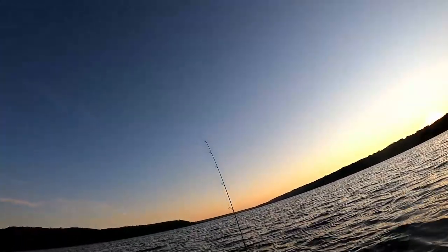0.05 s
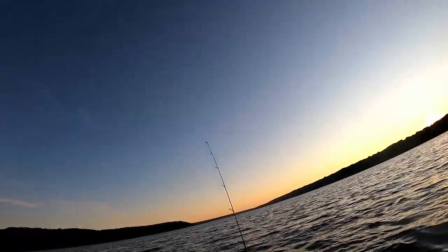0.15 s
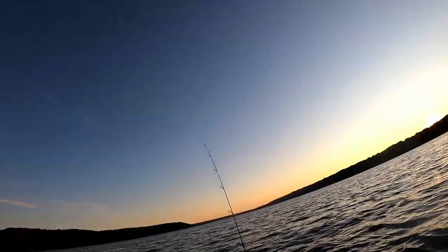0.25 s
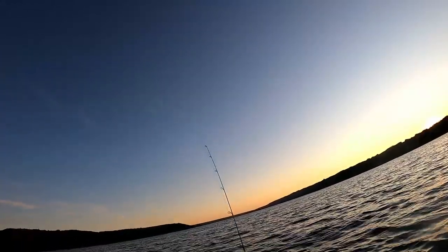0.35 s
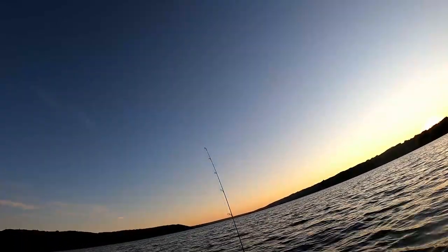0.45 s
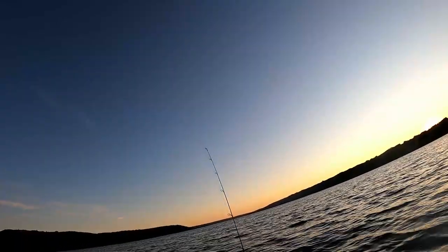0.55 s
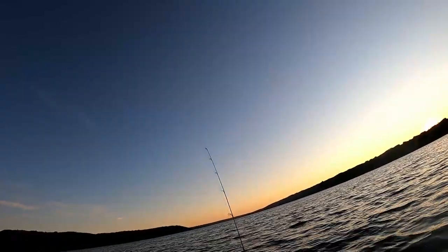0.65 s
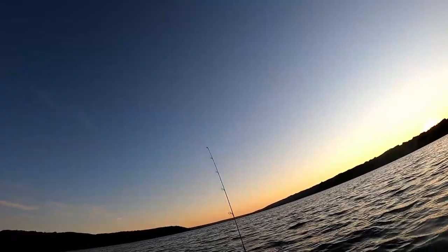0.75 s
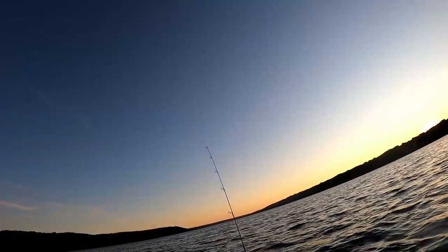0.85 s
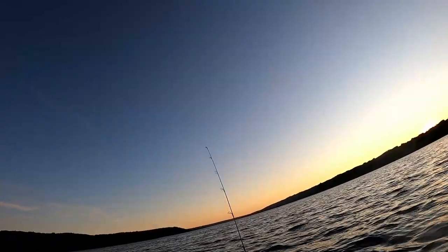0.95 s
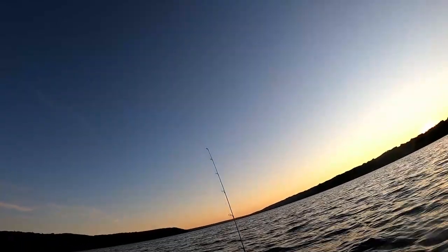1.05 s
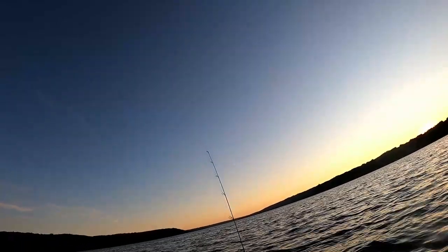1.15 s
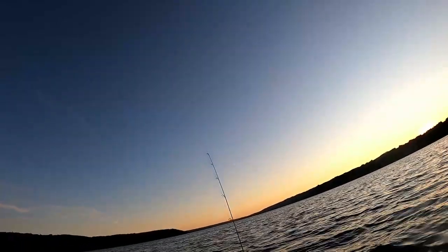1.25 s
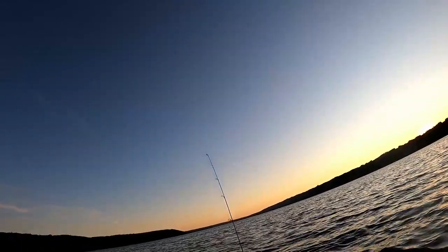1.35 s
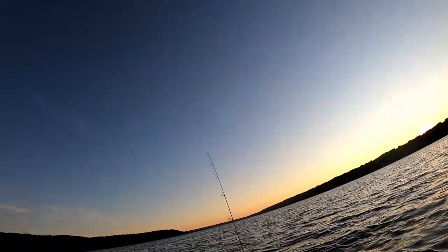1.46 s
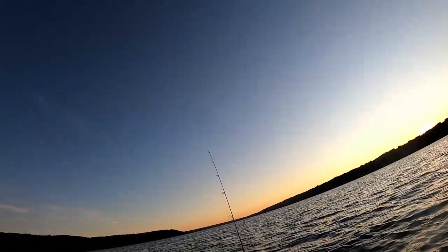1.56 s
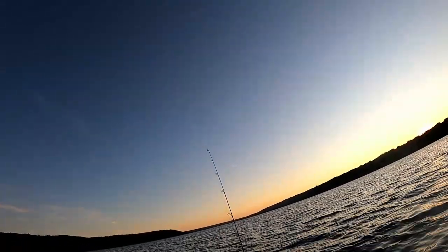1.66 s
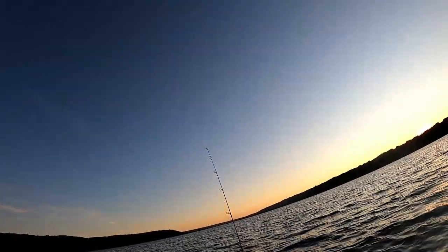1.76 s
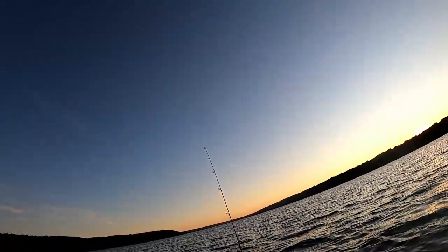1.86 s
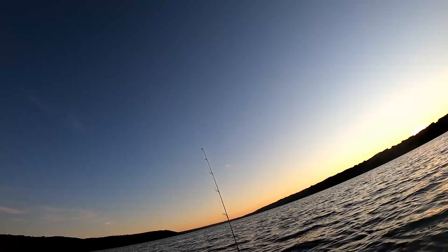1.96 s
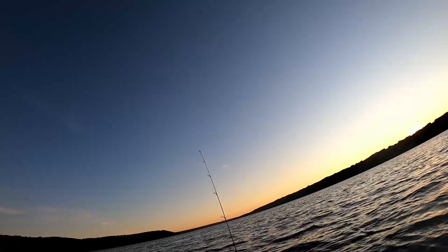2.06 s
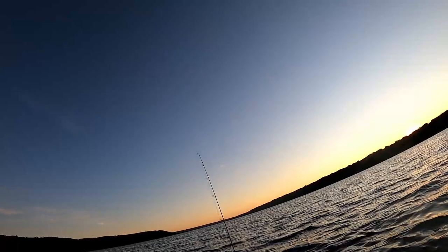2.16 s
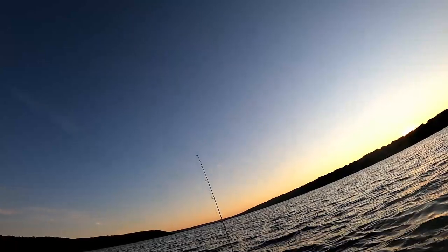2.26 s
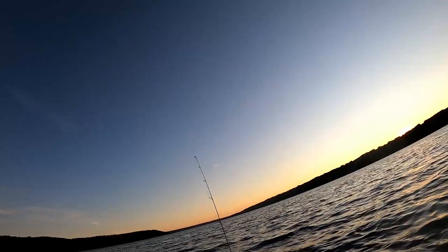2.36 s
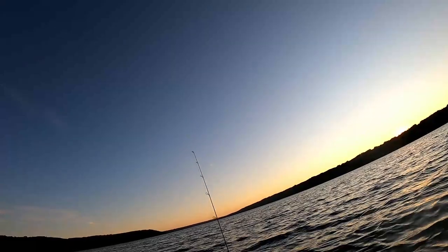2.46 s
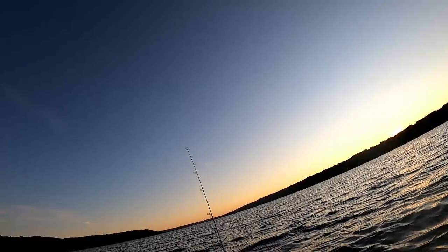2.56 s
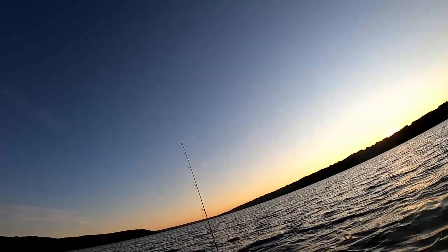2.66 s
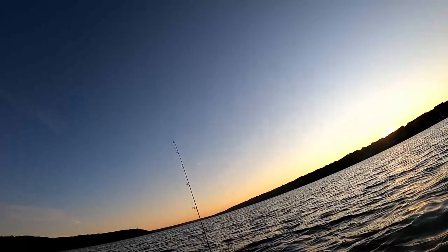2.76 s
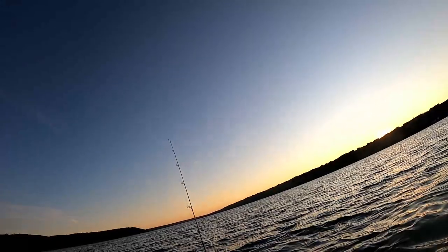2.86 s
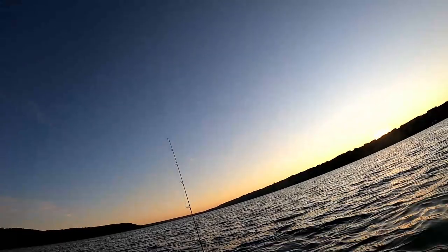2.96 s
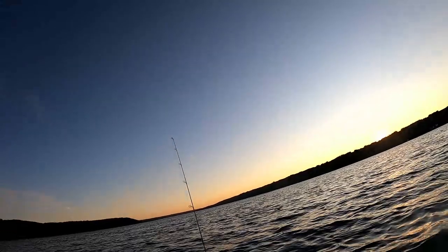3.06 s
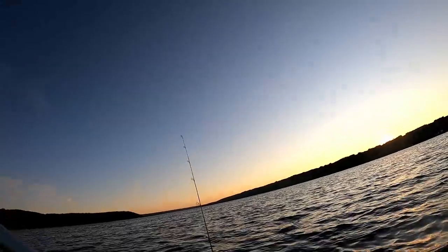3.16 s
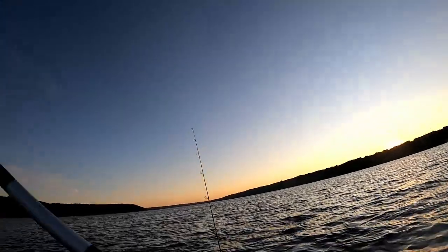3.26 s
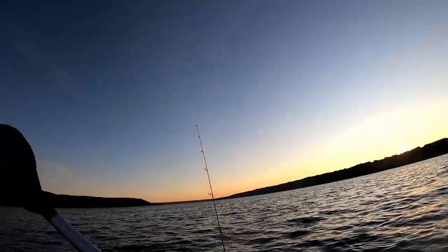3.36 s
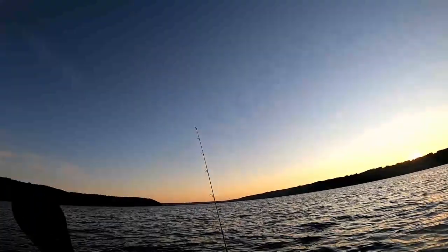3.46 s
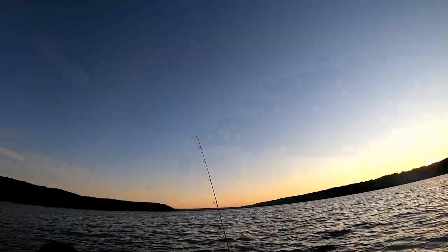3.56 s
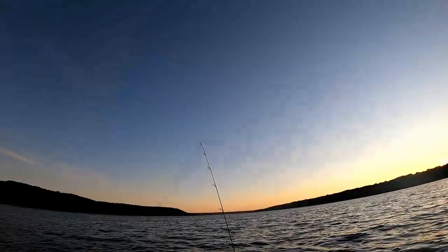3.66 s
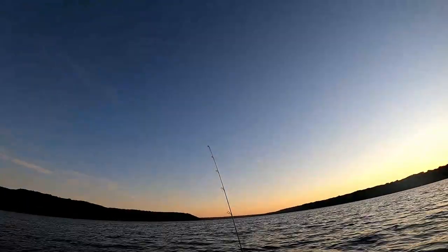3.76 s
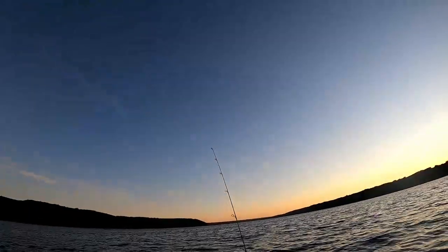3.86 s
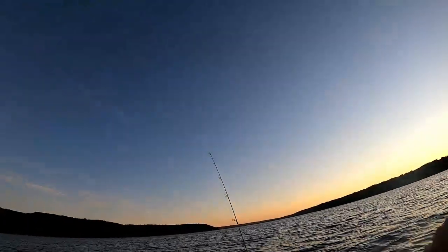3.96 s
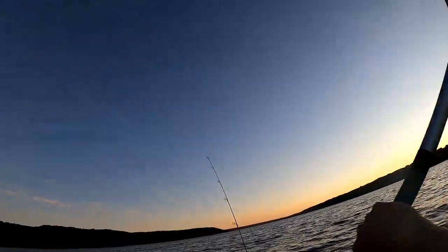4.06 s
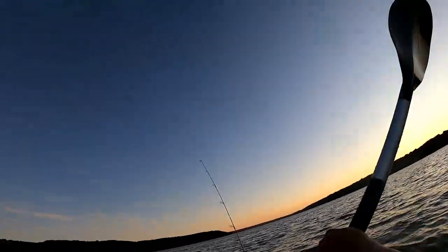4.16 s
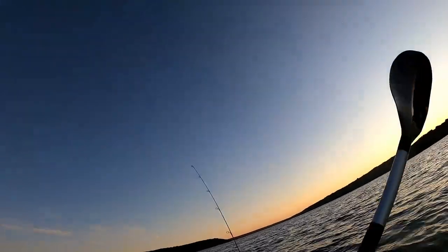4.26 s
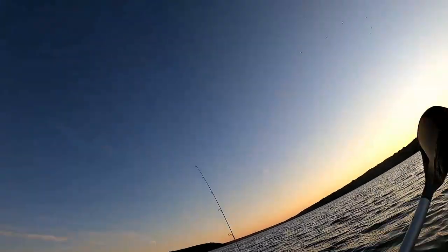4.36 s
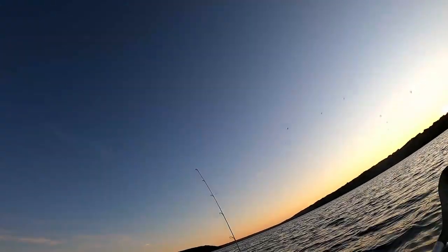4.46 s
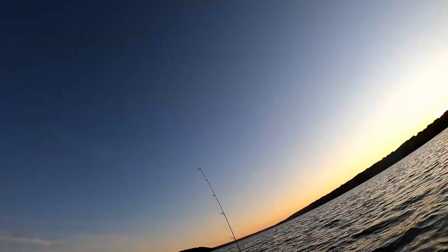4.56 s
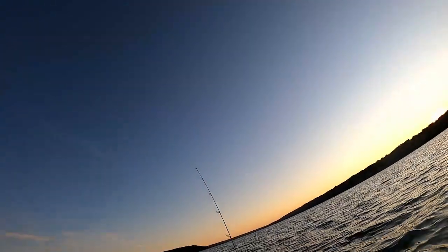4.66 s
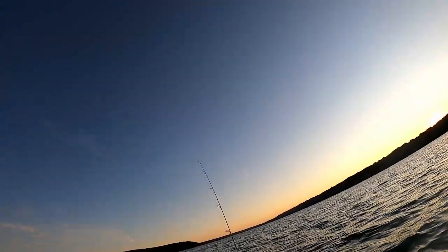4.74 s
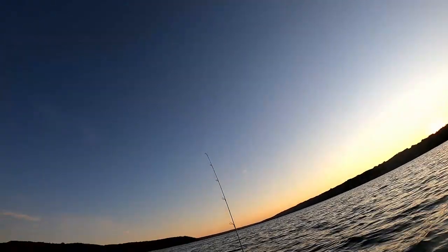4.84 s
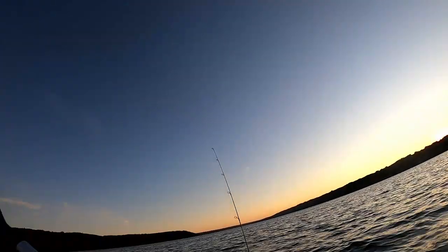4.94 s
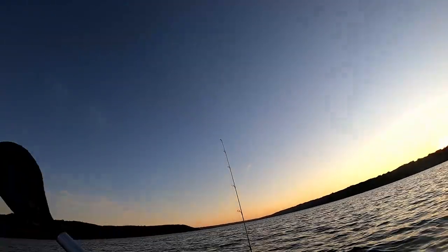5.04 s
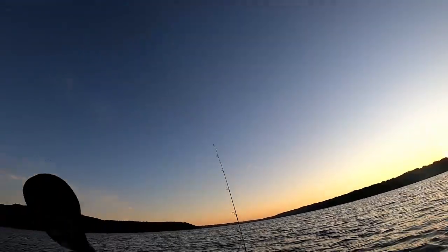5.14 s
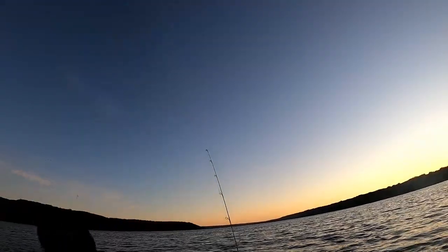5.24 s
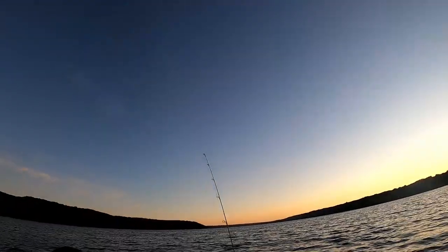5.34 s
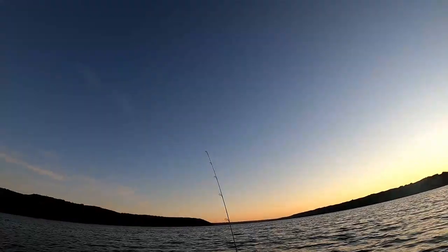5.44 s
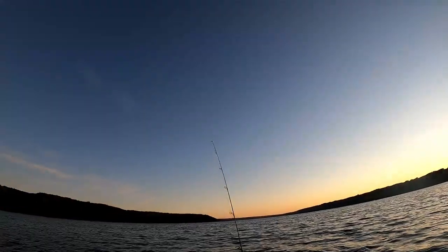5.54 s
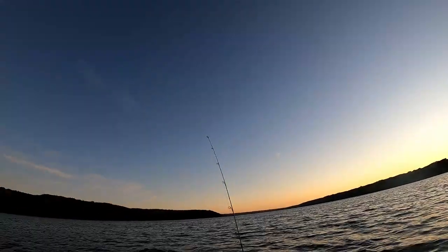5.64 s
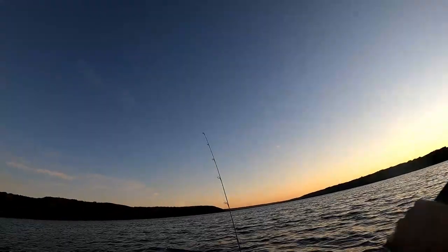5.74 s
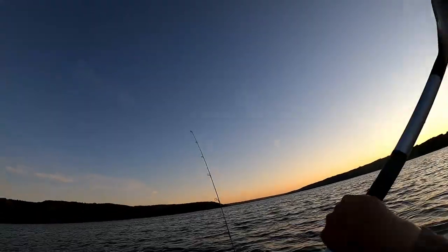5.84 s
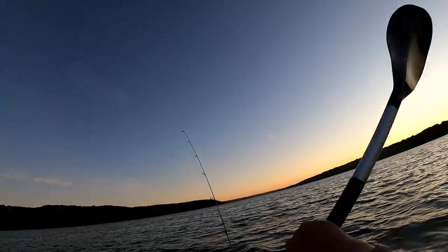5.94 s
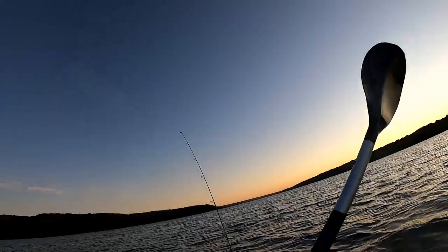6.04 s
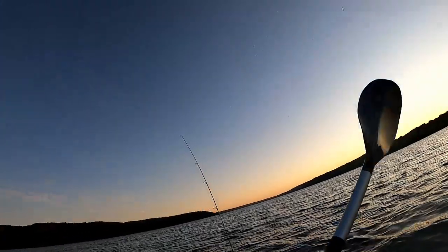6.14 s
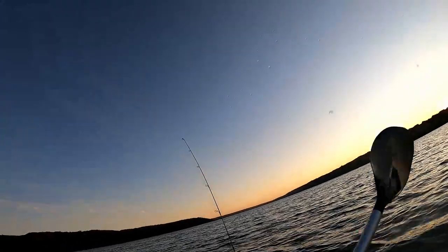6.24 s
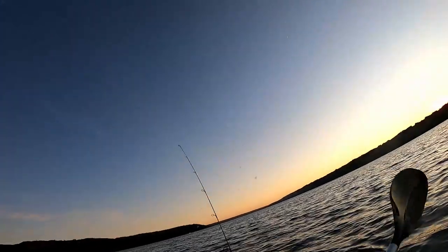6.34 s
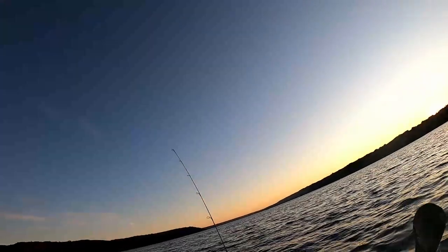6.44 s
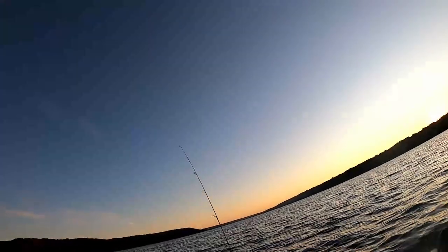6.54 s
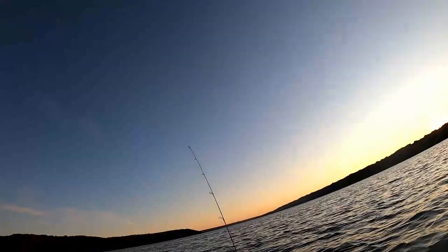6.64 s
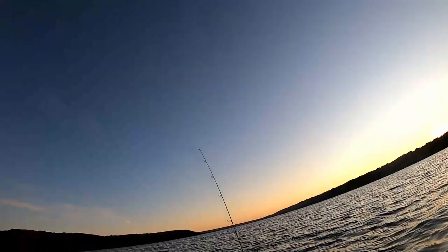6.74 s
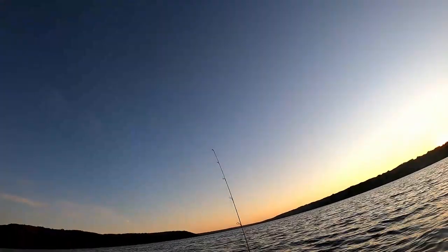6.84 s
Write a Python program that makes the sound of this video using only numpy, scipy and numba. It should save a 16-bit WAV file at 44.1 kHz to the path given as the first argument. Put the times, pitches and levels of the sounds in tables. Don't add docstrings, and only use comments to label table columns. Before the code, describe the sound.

A microphone in a housing sits on an inflatable kayak on a choppy lake, its treble softened. Low wind rumble comes in short, uneven puffs throughout, over a faint murmur of distant water. From 0 to 3.4 seconds the boat rests: quiet wavelets lap the hull, with bubbly drips and fine droplet ticks. A small slap comes at 1.3, a clearer plop with a bubble cluster near 2.5, and another slap at 3.25. Very faint, thin bird whistles occur around 2.0, 2.8 and 3.1. From 3.5 the paddle enters and the water grows much louder: hollow gulps and gurgling at 3.7 to 4.2, splashy wash and plinking drops at 4.3 to 5, more glugs around 5.3 to 5.6. Crisp spatter comes at 5.9 to 6.2, then a splash at 6.2 and deep gulp at 6.4, bubbling and dripping to the end. Wind buffets hardest around 4.3 to 4.7 and after 6.

```python
import sys
import numpy as np
from scipy import signal
from scipy.io import wavfile
from scipy.ndimage import uniform_filter1d
from numba import njit

SR = 44100
rng = np.random.default_rng(int(sys.argv[2]) if len(sys.argv) > 2 else 0)


def unload_audio(sound):
    columns = np.transpose(np.atleast_2d(sound))
    steps = np.round(np.clip(columns, -1, 1) * 32767)
    wavfile.write(sys.argv[1], SR, steps.astype(np.int16))


def volts_from_decibels(level):
    exponent = np.asarray(level, float) / 20
    return 10 ** exponent


N = 304290
STEP = 32


def rms_one(x):
    return x / np.sqrt(np.mean(x ** 2) + 1e-20)


def drift(rate_hz):
    r = np.exp(-2 * np.pi * rate_hz * STEP / SR)
    settle = 3000
    white = rng.standard_normal(N // STEP + 2 + settle)
    return rms_one(signal.lfilter([1], [1, -2 * r, r * r], white)[settle:])


def smooth_db(slow_db):
    return np.interp(np.arange(N) / STEP, np.arange(len(slow_db)), slow_db)


def smooth_gain(slow_db):
    return np.interp(np.arange(N) / STEP, np.arange(len(slow_db)), volts_from_decibels(slow_db))


def total_db(power):
    return smooth_db(10 * np.log10(power))


def surges(rows, rise_db_per_s, fall_db_per_s):
    t = np.arange(N // STEP + 2) * STEP / SR
    start, hold, level_db = np.transpose(rows)[:3, :, None]
    climb_db = rise_db_per_s * np.maximum(start - t, 0)
    fall_db = fall_db_per_s * np.maximum(t - start - hold, 0)
    return volts_from_decibels(2 * (level_db - climb_db - fall_db))


def banded_noise(spectrum, shared_db, own_db, rate_hz):
    hz, level_db = np.transpose(spectrum)
    edges = hz[0] * 2 ** np.arange(0, np.log2(hz[-1] / hz[0]) + .01, .5)
    out, together, white = 0, drift(rate_hz), rng.standard_normal((2, N))
    for k, (low, high) in enumerate(zip(edges, edges[1:])):
        sos = signal.butter(2, [low, high], "band", fs=SR, output="sos")
        band = signal.sosfilt(sos, white[k % 2])
        centre_db = np.interp(np.log(low * high) / 2, np.log(hz), level_db)
        out = out + band * smooth_gain(centre_db + shared_db * together + own_db * drift(rate_hz))
    return rms_one(out)


@njit
def add(out, at, hz, size, cycles, rise, sr):
    for i in range(len(at)):
        life = cycles[i] * sr / hz[i]
        fall, swell = np.exp(-7 / life), np.exp(-18 / life)
        tail, head = size[i], size[i]
        for n in range(min(int(life), len(out) - at[i])):
            phase = 2 * np.pi * hz[i] / sr * n * (1 + rise[i] * n / life)
            out[at[i] + n] += (tail - head) * np.sin(phase)
            tail, head = tail * fall, head * swell
    return out


def grains(per_s, low_hz, high_hz, cycles, rise, spread_db, tilt_db):
    chance, place, luck, life, climb = rng.random((5, N))
    at = np.nonzero(chance < per_s / SR)[0]
    hz = low_hz * (high_hz / low_hz) ** place[at]
    luck_db = spread_db * np.minimum(-np.log(1 - luck[at]), 4)
    size = volts_from_decibels(luck_db + tilt_db * np.log2(hz / low_hz))
    return rms_one(add(np.zeros(N), at, hz, size, cycles * (.5 + life[at]), 2 * rise * climb[at], SR))


def swarm(busy, per_s, low_hz, high_hz, cycles, spread_db, tilt_db):
    bursts = grains(per_s * busy, low_hz, high_hz, cycles, 0.271, spread_db, tilt_db)
    return rms_one(bursts / np.sqrt(busy))


def chirps(rows, rise):
    out = np.zeros(N + SR)
    for s, peak_db, hz, t60 in rows:
        t60 = np.clip(t60, .004, .3)
        t = np.arange(int(t60 * SR)) / SR
        shape = (1 - np.exp(-t * hz * 1.8)) ** 2 * volts_from_decibels(-60 * t / t60)
        tone = np.sin(2 * np.pi * hz * (t + rise * t * t / t60)) * shape / shape.max()
        out[round(s * SR):][:len(t)] += volts_from_decibels(peak_db) * tone
    return out[:N]


def small_bubbles(rows):
    return chirps([(s, peak_db, hz, 0.012 + 22 / hz) for s, peak_db, hz in rows], rise=0.14)


def ticks(drops, under_db, crackle):
    swell_cycles, puff_cycles, ring_cycles = 8, 30, 48
    out, t = np.zeros(N + SR), np.arange(500) / SR
    for (s, peak_db, hz), puff in zip(drops, rng.standard_normal((len(drops), 500))):
        swell = np.sin(np.pi / 2 * np.minimum(t * hz / swell_cycles, 1)) ** 2
        band = signal.butter(2, [hz / 1.3, hz * 1.4], "band", fs=SR, output="sos")
        puff = signal.sosfilt(band, puff * swell * volts_from_decibels(-60 * t * hz / puff_cycles))
        ring = np.sin(2 * np.pi * hz * (t + 6.1 * t * t)) * swell * volts_from_decibels(-60 * t * hz / ring_cycles)
        drop = crackle * puff / np.abs(puff).max() + 1.38 * ring
        start = round((s - .5 * swell_cycles / hz) * SR)
        out[start:][:500] += volts_from_decibels(peak_db - under_db) * drop
    return out[:N]


def slides(rows, wobble_db):
    out = np.zeros(N)
    for s, length, first_hz, last_hz, level_db in rows:
        hz = np.linspace(first_hz, last_hz, int(length * SR))
        fade = np.minimum(2 * np.hanning(len(hz)), 1) ** .5
        out[round(s * SR):][:len(hz)] += volts_from_decibels(level_db) * fade * np.sin(2 * np.pi * np.cumsum(hz) / SR)
    return out * smooth_gain(wobble_db * drift(70))


# (start [s], hold [s], rumble level [dB], buffet over the rumble [dB])
WIND_GUSTS = [(0.004, 0.053, -30.5, -12), (0.197, 0.027, -40.5, 3.5), (0.282, 0.057, -30.5, -25),
              (0.558, 0.2, -35.5, -6.5), (1.07, 0.5, -37.5, -7.5), (1.457, 0.26, -35, -26),
              (1.787, 0.013, -33.5, -15), (1.928, 0.075, -28, -17), (2.113, 0.22, -32, -11),
              (2.42, 0.08, -48.5, 10), (2.714, 0.013, -36, 0), (2.926, 0.29, -37, -15),
              (3.237, 0.36, -40.5, -4), (3.747, 0.039, -27, -13), (3.903, 0.21, -35, -1),
              (4.307, 0.17, -19.5, 0), (4.527, 0.055, -23.5, 12.5), (4.623, 0.1, -19.5, -1.5),
              (4.788, 0.26, -32.5, -10.5), (5.125, 0.43, -34.5, -6.5), (5.54, 0.017, -32, 2),
              (5.65, 0.25, -33.5, -8.5), (6.03, 0.3, -21.5, 0), (6.444, 0.36, -19.5, -1)]


def wind_levels():
    lull_rumble_db, lull_buffet_db = -41, -47
    gusts = surges(WIND_GUSTS, rise_db_per_s=495, fall_db_per_s=249)
    hardness = volts_from_decibels(2 * np.transpose(WIND_GUSTS)[3])
    rumble_db = total_db(volts_from_decibels(2 * lull_rumble_db) + gusts.sum(axis=0))
    buffet_db = total_db(volts_from_decibels(2 * lull_buffet_db) + hardness @ gusts)
    return rumble_db, buffet_db


# (frequency [Hz], level per Hz [dB])
RUMBLE_SPECTRUM = [(15, -11), (30, 5.5), (60, -5.5), (90, -2.5), (130, -19), (200, -38)]
# (frequency [Hz], level per Hz [dB])
BUFFET_SPECTRUM = [(60, 7), (110, 1.5), (170, 9), (250, -17.5), (400, -21), (800, -27.5)]
# (frequency [Hz], level per Hz [dB])
TEARING_SPECTRUM = [(150, -1), (260, -7), (400, -12.5), (700, -16.5), (1000, -34)]


def wind():
    rumble_db, buffet_db = wind_levels()
    rumble = banded_noise(RUMBLE_SPECTRUM, shared_db=2.0, own_db=-0.86, rate_hz=35.0)
    buffet = banded_noise(BUFFET_SPECTRUM, shared_db=0.0, own_db=4.5, rate_hz=20.2)
    tearing = banded_noise(TEARING_SPECTRUM, shared_db=7.5, own_db=3.0, rate_hz=37.5)
    tearing_db = 1.22 * buffet_db - 8.0
    return volts_from_decibels(rumble_db) * rumble + volts_from_decibels(buffet_db) * buffet + volts_from_decibels(tearing_db) * tearing


# (frequency [Hz], level per Hz [dB])
LAKE_SPECTRUM = [(120, -18.5), (200, -3), (454, -16), (923, -30), (1330, -16.5), (2420, -43), (8200, -47),
                 (15500, -75)]


def far_lake():
    return volts_from_decibels(-56.5) * banded_noise(LAKE_SPECTRUM, shared_db=1.2, own_db=2.2, rate_hz=6)


def hull_hum():
    centre_hz, width_hz, level_db = 305, 20, -65.5
    edges = [centre_hz - width_hz / 2, centre_hz + width_hz / 2]
    sos = signal.butter(2, edges, "band", fs=SR, output="sos")
    return volts_from_decibels(level_db) * rms_one(signal.sosfilt(sos, rng.standard_normal(N)))


# (time [s], peak level [dB], pitch [Hz])
HULL_PATTER = [(0.035, -52, 2700), (0.143, -46, 2520), (0.2, -45.5, 2520), (0.28, -48, 3600),
               (0.427, -51.5, 2880), (0.5117, -53.5, 2970), (0.6055, -55, 2820), (0.885, -49.5, 4230),
               (0.933, -61, 2900), (1.232, -43, 2280), (1.394, -48, 3050), (1.763, -50, 3180),
               (1.919, -59, 3000), (2.389, -52, 3200), (2.6474, -67, 2700), (2.692, -47, 3230),
               (2.7144, -36, 2700), (2.7636, -38, 2540), (3.209, -50, 2500), (3.285, -38, 3320),
               (3.448, -42, 2700)]


def patter():
    return ticks(HULL_PATTER, under_db=-3.0, crackle=0.73)


# (time [s], peak level [dB], pitch [Hz])
HULL_DRIPS = [(0.037, -43, 1350), (0.279, -40.5, 1250), (0.519, -46.5, 1340), (0.557, -40, 1350),
              (0.724, -39.5, 1700), (0.834, -45, 1190), (0.886, -40, 1400), (1.233, -43, 2690),
              (1.31, -38, 1140), (1.331, -32, 1230), (1.372, -39, 1800), (1.39, -39, 1340),
              (1.427, -40, 1640), (1.451, -39, 1430), (1.562, -38, 1480), (1.713, -45.5, 1410),
              (1.936, -45.5, 910), (2.002, -49.5, 1450), (2.281, -47, 1300), (2.398, -36, 1470),
              (2.466, -29, 1210), (2.484, -25, 1460), (2.496, -31, 1130), (2.482, -34, 1920),
              (2.508, -30, 1040), (2.694, -41, 1030), (2.762, -42.5, 1500), (2.727, -37, 1730),
              (2.762, -38, 2380), (2.867, -38.5, 1330), (3.207, -42, 1630), (3.249, -27.5, 1080),
              (3.292, -26, 713), (3.332, -30.5, 815)]


def drips():
    return small_bubbles(HULL_DRIPS)


# (time [s], peak level [dB], pitch [Hz])
FINE_SPATTER = [(0.05, -45.5, 6340), (0.1944, -65, 5320), (0.5112, -56, 6070), (0.7562, -63, 5960),
                (0.8764, -72, 5930), (0.9574, -70, 5380), (1.3384, -50, 5250), (1.3474, -47, 5290),
                (1.4042, -52, 5480), (1.8063, -69, 6020), (1.8482, -64, 5810), (2.0423, -67, 5490),
                (2.7023, -48, 6700), (2.9487, -58, 6980), (3.0834, -58, 5300), (3.2126, -50, 5300),
                (3.2779, -46, 5430), (3.3493, -60, 5900), (3.4775, -49, 8610), (4.2014, -54, 5580),
                (4.8988, -42, 5270), (5.1607, -48, 5740), (5.1946, -36, 6500), (5.267, -36, 6000),
                (5.8501, -36, 5830), (5.867, -39, 9200), (5.9086, -39, 10600), (5.915, -29, 6660),
                (5.921, -37, 8000), (6.049, -45, 10000), (6.0824, -32.5, 5320), (6.142, -31, 5480)]


def spatter():
    return ticks(FINE_SPATTER, under_db=3.5, crackle=1.45)


WATER_RISE_DB_PER_S, WATER_FALL_DB_PER_S = 179, 119.5

# (start [s], hold [s], level [dB])
HULL_LAPS = [
    (0.05, 0.23, -52),
    (.5, 0.47, -60),
    (1.24, 0.2, -56),
    (1.53, 0.082, -53.5),
    (2.38, 0.099, -64),
    (2.64, 0.13, -55),
    (3.25, 0.066, -48),
    (2.88, 0.36, -63.5),
    (3.41, 0.11, -54),
]


def lap_power(fall_db_per_s=WATER_FALL_DB_PER_S):
    return surges(HULL_LAPS, WATER_RISE_DB_PER_S, fall_db_per_s).sum(axis=0)


def trickle():
    lap_db = total_db(lap_power(WATER_FALL_DB_PER_S / 2))
    drops = grains(260, 810, 3940, cycles=28, rise=0.26, spread_db=8.5, tilt_db=-6.5)
    return volts_from_decibels(lap_db - 8.5) * drops


# (start [s], hold [s], level [dB])
BLADE_PULLS = [(3.547, 0.06, -45), (3.716, 0.21, -29.5), (3.97, 0.25, -35), (4.458, 0.41, -32),
               (5.063, 0.21, -42.5), (5.314, 0.12, -32), (5.533, 0.05, -26.5), (5.65, 0.28, -38),
               (6.185, 0.072, -28), (6.3, .07, -38), (6.412, 0.11, -29.5), (6.6, 0.17, -35.5)]


def pull_power():
    return surges(BLADE_PULLS, WATER_RISE_DB_PER_S, WATER_FALL_DB_PER_S).sum(axis=0)


# (start [s], hold [s], level [dB])
BLADE_WASHES = [
    (3.491, 0.17, -55.5),
    (3.688, 0.54, -54.5),
    (4.337, 0.17, -50.5),
    (4.559, 0.46, -49),
    (5.095, 0.26, -55.5),
    (5.387, 0.59, -55),
    (6.134, 0.18, -47),
    (6.315, 0.2, -53),
    (6.552, 0.26, -47.5),
]


def wash_power():
    return surges(BLADE_WASHES, WATER_RISE_DB_PER_S, WATER_FALL_DB_PER_S).sum(axis=0)


def water_levels():
    calm_gurgle_db, calm_splash_db, calm_spray_db = -62.5, -101, -85
    lap, pull, wash = lap_power(), pull_power(), wash_power()
    gurgle = volts_from_decibels(2 * calm_gurgle_db) + lap + pull
    splash = volts_from_decibels(2 * calm_splash_db) + volts_from_decibels(2 * -12) * lap + volts_from_decibels(2 * -13) * pull + volts_from_decibels(2 * 8.5) * wash
    spray = volts_from_decibels(2 * calm_spray_db) + volts_from_decibels(2 * -16) * lap + wash
    return total_db(gurgle), total_db(splash), total_db(spray)


# (frequency [Hz], level per Hz [dB])
SPRAY_SPECTRUM = [(1180, 6.5), (2000, -3.5), (3740, -8), (5740, -15), (7110, -31), (8360, -14),
                  (12600, -31), (13900, -45), (15500, -67)]


def stirred_water():
    gurgle_db, splash_db, spray_db = water_levels()
    churn = drift(22)
    busy = volts_from_decibels(.5 * (spray_db + 50))
    gurgle_rate, splash_rate = 900 * smooth_gain(2.5 * churn), 1600 * smooth_gain(3.5 * churn)
    fizz_rate = 2000 * smooth_gain(3.5 * churn)
    gurgle = swarm(busy, gurgle_rate, 187.8, 1303, cycles=19.6, spread_db=3.0, tilt_db=2.0)
    splash = swarm(busy, splash_rate, 757, 3770, cycles=25, spread_db=3.5, tilt_db=-2.0)
    fizz = swarm(busy, fizz_rate, 2200, 9000, cycles=15, spread_db=5, tilt_db=-5)
    hiss = banded_noise(SPRAY_SPECTRUM, shared_db=.8, own_db=2.2, rate_hz=30) * smooth_gain(1.2 * churn)
    spray = volts_from_decibels(1.0) * fizz + volts_from_decibels(8.5) * hiss
    mist = signal.sosfilt(signal.butter(1, 7500, "high", fs=SR, output="sos"), spray)
    mist_db = 5.5 * (spray_db + 46.5) + smooth_db(4.6 * drift(31))
    spray += (volts_from_decibels(mist_db) - 1) * mist
    return volts_from_decibels(gurgle_db) * gurgle + volts_from_decibels(splash_db) * splash + volts_from_decibels(spray_db) * spray


# (time [s], peak level [dB], pitch [Hz])
HULL_RUNOFF = [(0.0802, -41, 2320), (0.0944, -48, 2920), (0.125, -38, 2210), (0.3057, -62, 2470),
               (0.3164, -56, 2500), (0.335, -45, 2280), (0.3676, -47, 2800), (0.4065, -45, 3030),
               (0.4673, -49, 2110), (0.5561, -47, 2200), (0.6194, -50, 3280), (0.6365, -52, 2950),
               (0.7033, -43, 1930), (0.7507, -49, 2300), (0.7876, -49, 2060), (0.8094, -47, 2470),
               (0.9094, -48, 2190), (0.9413, -48, 3630), (1.0031, -53, 2830), (1.1553, -56, 3360),
               (1.21, -53, 2400), (1.2915, -55, 2290), (1.413, -40, 1960), (1.5369, -57, 2690),
               (1.6097, -54.5, 2350), (1.6474, -53, 2360), (1.892, -46.5, 1980), (2.0168, -63, 2030),
               (2.369, -53, 2100), (2.7901, -43, 2440), (2.9936, -48, 2620), (3.0604, -53, 2140),
               (3.1456, -44, 2060), (3.1817, -42, 2080), (3.4002, -60, 2600), (3.4216, -48, 2060)]


def runoff():
    return ticks(HULL_RUNOFF, under_db=5.5, crackle=0.82)


# (time [s], peak level [dB], low part over it [dB],
# high part over it [dB], 60 dB decay [s])
WATER_SLAPS = [(0.141, -37.5, 4, -16, 0.14), (0.198, -49, 0, -19, 0.068), (0.786, -41, 10, -25, 0.069),
               (1.329, -31, 4.5, -9.5, 0.13), (1.373, -42.5, 13.5, -20, 0.089), (1.399, -37, -9, -5, 0.037),
               (1.564, -49, 11.5, -23, 0.11), (2.289, -39.5, 8, 7, 0.035), (2.385, -39.5, 5.5, -10, 0.16),
               (2.434, -43, 7.5, -9, 0.37), (2.463, -25, -4, -15, 0.037), (2.483, -36, 12, -37, 0.12),
               (2.507, -47, 13, -30, 0.05), (3.24, -25.5, 0.5, -8, 0.12), (3.27, -40.5, 18.5, -27, 0.26),
               (3.2914, -39, 8, -35, 0.071), (3.867, -24, -1.5, -21, 0.093), (4.11, -29, -16, -10, 0.19),
               (4.198, -18, -12, -10, 0.035), (4.624, -29, 4, -16, 0.74), (5.024, -22, -18, -10, 0.084),
               (5.112, -23.5, -2.5, -20, 0.049), (5.905, -29, -4.5, 0, 0.16),
               (6.084, -28.5, -29, 24, 0.037), (6.1625, -33, -19, 16.5, 0.083),
               (6.211, -19.5, 5, -1.5, 0.14)]


def slap_strength():
    out = np.zeros((3, N + SR))
    rise_s, bend = [[.004], [.009], [.03]], [[1], [1.5], [2]]
    for s, peak_db, low_db, high_db, t60 in WATER_SLAPS:
        t = np.arange(int(np.clip(t60, .01, .4) * SR)) / SR
        shape = np.minimum(t / rise_s, 1) ** bend * volts_from_decibels(peak_db - 5.0 - 60 * t / t60)
        out[:, round(s * SR):][:, :len(t)] += volts_from_decibels(np.array([[low_db], [0], [high_db]])) * shape
    return out[:, :N]


def slaps():
    low, middle, high = slap_strength()
    out = low * grains(900, 180.0, 1370, cycles=10.2, rise=0.16, spread_db=3.5, tilt_db=0.0)
    out += middle * grains(2500, 1230, 3680, cycles=7.8, rise=0.24, spread_db=-5.5, tilt_db=-3.0)
    out += high * grains(5500, 3770, 12600, cycles=7.6, rise=0.13, spread_db=4.5, tilt_db=-10.5)
    return out


# (time [s], peak level [dB], pitch [Hz], 60 dB decay [s])
AIR_GULPS = [(0.143, -43, 310, 0.056), (0.752, -38.5, 550, 0.028), (1.395, -35.5, 590, 0.04),
             (1.561, -39, 608, 0.068), (2.09, -38.5, 278, 0.064), (2.119, -34.5, 490, 0.012),
             (2.398, -30, 437, 0.027), (2.467, -18.5, 382, 0.026), (2.669, -31.5, 350, 0.0046),
             (3.249, -27, 260, 0.039), (3.312, -26, 606, 0.029), (3.891, -20, 417, 0.041),
             (3.942, -22, 250, 0.037), (4.329, -34, 445, 0.06), (4.976, -28.5, 490, 0.059),
             (5.336, -17.5, 492, 0.039), (5.397, -31.5, 263, 0.14), (5.5, -21.5, 600, 0.046),
             (5.589, -27.5, 425.5, 0.36), (5.748, -28, 590, 0.088), (6.353, -25, 446, 0.12),
             (6.411, -15, 473, 0.023)]


def gulps():
    return chirps(AIR_GULPS, rise=0.2)


# (start [s], length [s], first pitch [Hz], last pitch [Hz], level [dB])
BUBBLE_GLIDES = [(.165, 0.064, 444, 502, -38), (.955, 0.031, 1110, 1250, -51),
                 (1.59, 0.013, 1390, 1900, -45), (5.868, 0.066, 508, 1526, -47),
                 (6.086, 0.015, 2310, 1900, -40), (1.44, 0.02, 800, 1410, -41.5),
                 (1.755, 0.034, 890, 980, -60), (0.332, 0.019, 2250, 2860, -60),
                 (5.235, 0.05, 652, 1210, -60), (1.95, 0.04, 870, 1370, -50),
                 (2.345, 0.024, 517, 650, -50.5), (2.898, 0.036, 1500, 2670, -55),
                 (3.41, 0.032, 710, 960, -41), (3.465, 0.034, 1270, 3050, -40.5),
                 (3.61, 0.016, 943, 1580, -33), (3.795, 0.018, 526, 240, -19.5),
                 (4.135, 0.066, 159, 236, -24), (4.82, 0.076, 216, 287, -25.5)]


def glides():
    return slides(BUBBLE_GLIDES, wobble_db=4.0)


# (time [s], peak level [dB], pitch [Hz])
FINE_SPITS = [(0.5717, -53.5, 6300), (1.5449, -63, 6000), (1.5754, -59, 5930), (1.6104, -47.5, 5000),
              (1.8627, -55.5, 5900), (2.163, -62, 8100), (2.178, -57, 6270), (2.531, -57, 4970),
              (2.6745, -55, 8160), (2.726, -41, 6260), (2.7591, -54, 5720), (2.973, -64, 4870)]


def spits():
    return ticks(FINE_SPITS, under_db=-3.0, crackle=0.73)


# (start [s], length [s], first pitch [Hz], last pitch [Hz], level [dB])
BIRD_NOTES = [
    (2.025, 0.13, 1515, 1550, -61),
    (2.81, 0.17, 1590, 1590, -66),
    (3.06, 0.15, 1850, 1910, -68),
]


def far_bird():
    return slides(BIRD_NOTES, wobble_db=3.5)


# (time [s], peak level [dB], pitch [Hz])
PADDLE_BUBBLES = [(3.521, -27.5, 1660), (3.61, -32, 1050), (3.775, -23, 910), (4.013, -22.5, 750),
                  (4.412, -28, 760), (4.477, -24.5, 1180), (4.55, -25, 983), (4.623, -21, 730),
                  (5.118, -24.5, 858), (5.114, -21.5, 1710), (5.287, -20.5, 1390), (5.487, -27, 1000),
                  (5.512, -25, 1000), (5.544, -29, 790), (5.559, -15.5, 774), (5.709, -28, 1026),
                  (5.726, -27.5, 1046), (5.881, -29, 822), (5.919, -26, 857), (6.038, -27.5, 1100),
                  (6.163, -27, 1016), (6.18, -25, 1000), (6.246, -25, 1000), (6.262, -21.5, 1250),
                  (6.287, -20.5, 870), (6.315, -25, 716), (6.407, -20.5, 1097), (6.652, -20, 720),
                  (6.829, -23, 1090)]


def paddle_bubbles():
    return small_bubbles(PADDLE_BUBBLES)


# (time [s], peak level [dB], pitch [Hz])
THROWN_DROPS = [(3.5453, -27, 2100), (3.5594, -26, 2050), (3.8684, -32, 2070), (4.0971, -31, 2040),
                (4.133, -25, 2190), (4.169, -25.5, 1960), (4.2, -28, 2060), (4.2852, -30.5, 3140),
                (4.342, -24, 2150), (4.4956, -28, 2120), (4.6305, -17.5, 3540), (4.6728, -20, 1940),
                (4.7114, -33, 2060), (4.787, -37, 2260), (4.804, -17.5, 2130), (4.8964, -20, 3350),
                (4.9846, -24, 2330), (5.1394, -29, 1880), (5.1994, -32, 3260), (5.243, -28, 2470),
                (5.332, -20, 2064), (5.574, -23.5, 3220), (5.7783, -30, 3680), (5.809, -38, 1960),
                (5.909, -21, 2930), (6.0676, -32, 2770), (6.0846, -22.5, 1955), (6.1963, -21, 1900),
                (6.2336, -39, 1920), (6.2946, -25, 3100), (6.325, -17.5, 2030), (6.371, -36, 2500),
                (6.54, -21.5, 2060), (6.558, -36, 1960), (6.6273, -38, 2820), (6.6934, -27, 1930),
                (6.7374, -33, 1950), (6.7494, -24, 3200), (6.78, -19, 2970), (6.86, -24, 2650)]


def thrown_drops():
    return ticks(THROWN_DROPS, under_db=5.5, crackle=0.82)


# (time [s], peak level [dB], pitch [Hz])
WAKE_BUBBLES = [(3.644, -33, 486), (3.678, -32, 560), (3.717, -38, 740), (3.817, -27, 655),
                (3.891, -23.5, 880), (3.919, -28, 865), (3.969, -23.5, 493), (4.059, -37, 746),
                (4.117, -29, 820), (4.249, -46, 570), (4.359, -24, 870), (4.434, -30, 450),
                (4.589, -38, 509), (4.659, -42, 730), (4.709, -35, 520), (4.859, -32, 448),
                (4.929, -45, 755), (5.135, -29, 870), (5.231, -30, 705), (5.358, -42, 474),
                (5.401, -29, 1050), (5.439, -42, 614), (5.598, -23.5, 474), (5.634, -26, 514),
                (5.683, -25, 670), (5.77, -29.5, 1190), (5.827, -28, 616), (5.959, -30, 910),
                (6.119, -30, 500), (6.45, -37, 450), (6.506, -23, 448), (6.579, -42, 600),
                (6.697, -32, 484), (6.739, -37, 456), (6.783, -34, 447)]


def wake_bubbles():
    return small_bubbles(WAKE_BUBBLES)


# (time [s], peak level [dB], pitch [Hz])
SKIN_TICKS = [(3.741, -35, 4170), (4.617, -40, 4400), (4.757, -35, 5100), (4.974, -30, 4700),
              (5.028, -30.5, 3900), (5.312, -30.5, 4380), (5.745, -35.5, 4400), (5.909, -28.5, 6160),
              (6.161, -28.5, 5300), (6.219, -26.5, 4570), (6.6527, -34, 3980), (6.8398, -34, 4500)]


def skin_ticks():
    return ticks(SKIN_TICKS, under_db=-3.0, crackle=0.73)


def scene():
    air = wind() + far_lake() + hull_hum() + far_bird()
    hull = patter() + drips() + spatter() + trickle() + runoff() + glides() + spits()
    water = stirred_water() + slaps() + gulps()
    paddle = paddle_bubbles() + thrown_drops() + wake_bubbles() + skin_ticks()
    return (air + hull + water + paddle)[None]


def treble_gate(x):
    gate_from_hz, gate_db = 6500, -112
    hz, _, z = signal.stft(x, SR, nperseg=1024)
    band_power = np.abs(uniform_filter1d(np.abs(z) ** 2, size=12, axis=1))
    band_db = 10 * np.log10(band_power + 1e-20)
    gate = np.clip((band_db - gate_db) / 2, 0, 1)
    z = z * np.where(hz[:, None] > gate_from_hz, gate, 1)
    return signal.istft(z, SR, nperseg=1024)[1][:, :N]


def roll_off(x):
    return signal.sosfilt(signal.butter(12, 15680, fs=SR, output="sos"), x)


def record(dry):
    dull = signal.sosfilt(signal.butter(3, 11450, fs=SR, output="sos"), dry)
    mix = 0.68 * np.tanh(treble_gate(dull) / 0.94)
    return roll_off(mix)


dry = scene()
out = record(dry)
unload_audio(out)
```